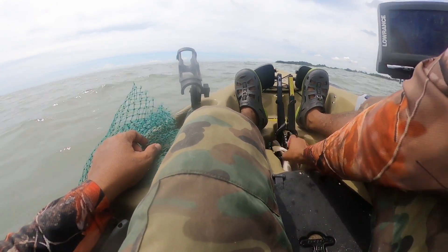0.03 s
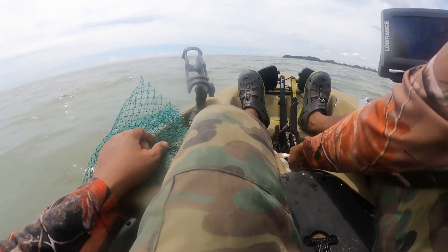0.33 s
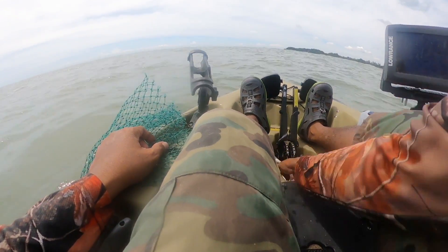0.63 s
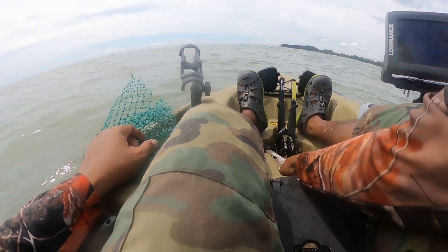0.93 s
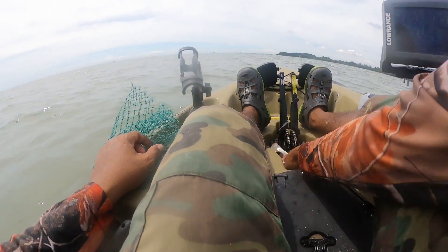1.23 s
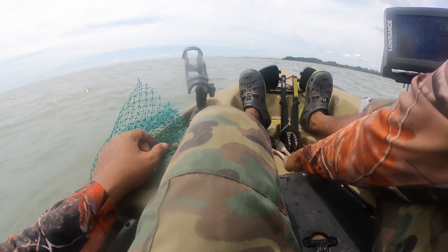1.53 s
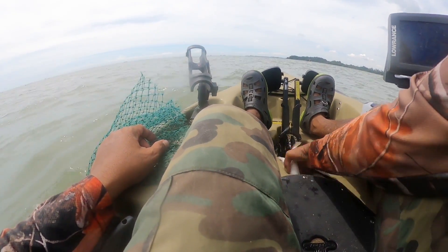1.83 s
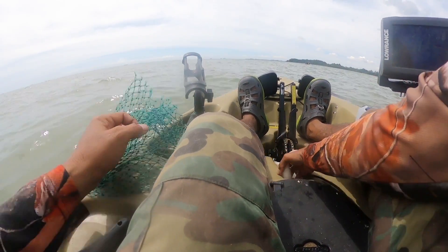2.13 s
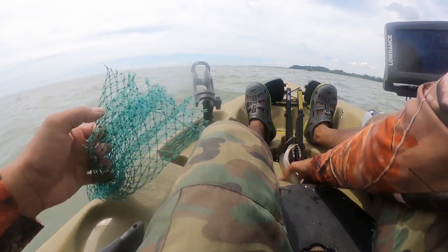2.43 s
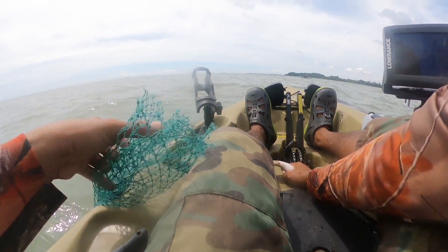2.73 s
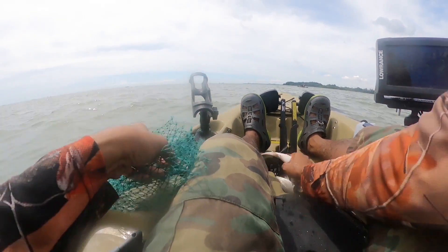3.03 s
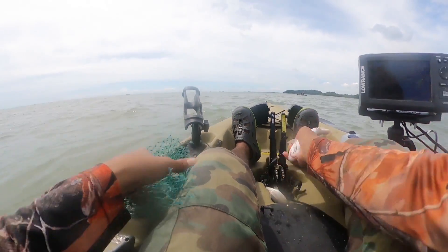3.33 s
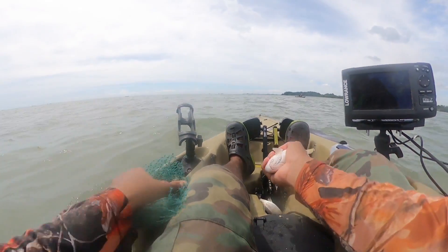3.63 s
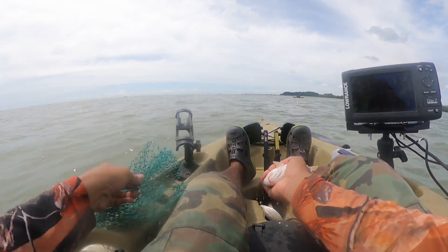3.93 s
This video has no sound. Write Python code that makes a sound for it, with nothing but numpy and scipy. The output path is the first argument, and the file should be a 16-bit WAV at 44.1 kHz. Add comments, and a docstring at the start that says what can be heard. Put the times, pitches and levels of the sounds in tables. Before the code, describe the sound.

Water laps against a plastic kayak with irregular hollow knocks, plops and small splashes, close by. Halfway through, a lifted wet net crackles, followed by rustling cloth, while gusts buffet the microphone over a low wash of open water.

```python
"""Waves against a kayak

Small waves slap, plop and gurgle against a hollow plastic hull, ringing its modes; heard from the seat.
A wet net is lifted, crackles and drips; sleeves rustle. Drips and plops ring as bubbles, spray is
grainy noise. Wind rumbles and thumps on the microphone over a low wash of open water."""
import sys
import numpy as np
from scipy import signal
from scipy.fft import rfft, irfft
from scipy.io import wavfile
from scipy.ndimage import uniform_filter1d

SR = 44100
rng = np.random.default_rng(int(sys.argv[2]) if len(sys.argv) > 2 else 0)


def int16_out(signal):
    """Quantize to a 16-bit WAV file."""
    q = np.round(np.clip(np.atleast_2d(signal).T, -1, 1) * 32767)
    wavfile.write(sys.argv[1], SR, q.astype(np.int16))


N = 176400
TIME_S = np.arange(N) / SR
LEAD_S, TAIL_S = 0.08, 0.2
EVENT_TIME_S = np.arange(-LEAD_S, TAIL_S, 1 / SR)


def amp(db):
    return 10 ** (np.asarray(db) / 20)


def unit_rms(x):
    return x / np.sqrt(np.mean(x ** 2) + 1e-20)


def unit_crest(x):
    """Scales the loudest 4 ms to rms 1."""
    return x / np.sqrt(uniform_filter1d(x ** 2, 180).max() + 1e-20)


def add(mix, start_s, sound):
    at = round(start_s * SR)
    part = mix[max(at, 0):max(at + len(sound), 0)]
    part += sound[max(-at, 0):][:len(part)]


def colour(x, spectrum):
    """Filters by (f/Hz, gain/dB) points on a log-frequency axis."""
    hz, db = np.transpose(spectrum)
    bins_hz = np.fft.rfftfreq(len(x), 1 / SR)
    gain = amp(np.interp(np.log(bins_hz + 1), np.log(hz), db))
    return irfft(rfft(x) * gain, len(x))


def wander(axis, step, count=2048):
    """Random curve with a new value at each step."""
    return np.interp((axis - axis[0]) / step, np.arange(count), rng.standard_normal(count), period=count)


def envelope(points):
    """Gain from (t/s, level/dB) points."""
    return amp(np.interp(TIME_S, *np.transpose(points)))


def burst(rise_s, decay_s):
    """Exponential swell to event time 0, then decay."""
    return np.exp(np.minimum(EVENT_TIME_S, 0) / rise_s - np.maximum(EVENT_TIME_S, 0) / decay_s)


def impulses(per_s):
    return rng.random(N) < per_s / SR


def turbulence(spectrum, flutter_db, step_s=0.028):
    """Coloured noise with a fluttering level."""
    flutter = amp(flutter_db * wander(TIME_S, step_s))
    return unit_rms(colour(rng.standard_normal(N) * flutter, spectrum))


# Wind spectrum: f/Hz, gain/dB
WIND_SPECTRUM = [(10, 2.5), (30, -1.5), (60, -2.5), (115, -8.5), (160, -12), (225, -19), (400, -28.5),
                 (800, -44), (2500, -92.5)]
# Gusts: t/s, level/dB
WIND_LEVEL = [(0, -44.5), (.43, -42.5), (.5, -29.5), (.6, -35), (.76, -43.5), (.83, -34), (1.3, -33.5),
              (1.52, -36.5), (1.70, -24.5), (1.8, -32.5), (1.98, -22.5), (2.15, -29.5), (2.32, -27.5),
              (2.6, -37.5), (2.84, -20.5), (3.06, -38), (3.16, -35.5), (3.43, -29.5), (3.55, -44),
              (3.71, -32), (3.88, -43), (4, -33.5)]
def wind():
    """Gusts buffet the microphone."""
    return envelope(WIND_LEVEL) * turbulence(WIND_SPECTRUM, flutter_db=2)


# Wash spectrum: f/Hz, gain/dB
WASH_SPECTRUM = [(30, 1), (120, 7), (210, 6), (400, -2.5), (600, -16.5), (1000, -26), (2000, -34),
                 (5500, -41), (8000, -48), (15000, -69.5)]
# Wash envelope: t/s, level/dB
WASH_LEVEL = [(0, -43), (1.3, -41), (2.4, -48), (3.1, -54), (4, -55)]
def wash():
    """Water churns low under the hull."""
    return envelope(WASH_LEVEL) * turbulence(WASH_SPECTRUM, flutter_db=3.2)


# Slosh spectrum: f/Hz, gain/dB
SLOSH_SPECTRUM = [(150, -51), (350, 13.5), (520, 9.5), (750, -0.5), (1080, 6), (1500, -9), (3000, -20.5),
                  (7000, -72)]
# Slosh envelope: t/s, level/dB
SLOSH_LEVEL = [(0, -75.5), (.75, -57), (.83, -51), (1.3, -67.5), (2.1, -54), (2.6, -58.5), (3.0, -55.5),
               (3.12, -47), (3.2, -57.5), (3.4, -59.5), (3.58, -48.5), (3.9, -57), (4, -53.5)]
def slosh():
    """Water sloshes alongside with a fast flutter."""
    return envelope(SLOSH_LEVEL) * turbulence(SLOSH_SPECTRUM, flutter_db=4.5, step_s=0.009)


# Rustle spectrum: f/Hz, gain/dB
RUSTLE_SPECTRUM = [(200, -9), (600, 12), (1100, 5), (1800, 3), (3000, -1), (4500, -3), (6200, -8.5),
                   (8000, -20.5), (11000, -31), (15000, -57)]
# Net and sleeve movement: t/s, level/dB
RUSTLE_LEVEL = [(0, -89), (.16, -58), (.43, -65), (.54, -56.5), (.68, -65), (1.08, -72), (1.18, -61.5),
                (1.37, -62), (1.43, -87), (1.55, -79), (1.83, -74), (2.03, -64), (2.13, -57), (2.47, -59.5),
                (2.52, -53), (2.62, -63), (2.97, -65.5), (3.36, -56.5), (3.44, -49), (3.53, -55),
                (3.67, -58.5), (3.73, -48.5), (3.8, -56), (3.84, -50), (3.92, -63.5), (4, -62.5)]
def rustle(snap_share=0.45):
    """Wet mesh and cloth rub: a hiss full of tiny snaps."""
    snap_db = 2.5 * np.minimum(rng.exponential(1, N), 5)
    snaps = impulses(per_s=900) * rng.choice([-1, 1], N) * amp(snap_db)
    crackle = unit_rms(colour(snaps, RUSTLE_SPECTRUM))
    hiss = turbulence(RUSTLE_SPECTRUM, flutter_db=2.5)
    return envelope(RUSTLE_LEVEL) * (np.sqrt(snap_share) * crackle + np.sqrt(1 - snap_share) * hiss)


# Modes of the hull and its air pocket: f/Hz, gain/dB, t60/s
HULL_MODES = [(234, 0.5, 0.033), (324, 1, 0.046), (406.6, 14, 0.055), (452, -4, 0.028), (541, -7, 0.074),
              (863, -2.5, 0.051), (1076, -28.5, 0.01), (1305, -18.5, 0.056), (1610, -16.5, 0.021)]
def hull(push, detune=0.02, uneven_db=1.0, cutoff_hz=1750):
    """Hull modes ring, shifting with waterline and spot hit; water softens each push."""
    t = np.arange(0, TAIL_S, 1 / SR)
    shifts, spots = rng.uniform(-1, 1, (2, len(HULL_MODES)))
    ring = np.zeros(len(t))
    for (hz, db, t60_s), shift, spot in zip(HULL_MODES, shifts, spots):
        fade = amp(db + uneven_db * spot - 60 * t / t60_s)
        ring += fade * np.sin(2 * np.pi * hz * (1 + detune * shift) * t)
    lowpass = signal.butter(2, cutoff_hz, fs=SR, output="sos")
    return signal.sosfilt(lowpass, signal.fftconvolve(push, ring))


def splash(spectrum, rise_s, decay_s, grain_db=2, grain_s=0.0019, ripple_db=3.5, ripple_hz=260):
    """Breaking water: a grainy burst with its own resonances, amid softer splashing."""
    n = len(EVENT_TIME_S)
    grains = rng.standard_normal(n) * amp(grain_db * wander(EVENT_TIME_S, grain_s))
    resonances = amp(ripple_db * wander(np.fft.rfftfreq(n, 1 / SR), ripple_hz))
    noise = irfft(rfft(grains) * resonances, n)
    skirt = amp(-14.5) * burst(rise_s=0.012, decay_s=0.016)
    shape = burst(rise_s, decay_s) + skirt
    return unit_crest(colour(noise * shape, spectrum))


SPRAY_RISE_PER_DECAY = 0.41
# Smack spectrum: f/Hz, gain/dB
SMACK_SPECTRUM = [(200, -27.5), (500, 1), (900, 3), (1400, 3.5), (1700, -1), (2200, -8.5), (3200, -39),
                  (7000, -57)]
# Spray spectrum: f/Hz, gain/dB
SPRAY_SPECTRUM = [(500, -45), (1500, 1), (2300, 1.5), (3100, 3), (4000, -2.5), (5600, -6), (6700, -14),
                  (8000, -25.5), (11500, -40), (15000, -68.5)]
# Water and wet gear hitting the hull: t/s, knock/dB, smack/dB, spray/dB, spray decay/s
SLAPS = [(0.141, -29.5, -39, -47.5, 0.0045), (0.215, -29.5, -58, -75, .005), (0.400, -31, -62, -63, .006),
         (.470, -21.5, -31.5, -35.5, 0.0051), (0.621, -38, -44.5, -44.5, 0.0028),
         (0.756, -31, -65, -79, .006), (.797, -31, -59, -80, .005), (0.829, -34, -52, -57, 0.008),
         (.866, -37, -47, -51, 0.018), (0.922, -31.5, -59, -58.5, 0.017),
         (0.979, -43, -47.5, -53.5, 0.0032), (1.166, -39, -74, -60, 0.014), (1.672, -42.5, -69, -49, 0.018),
         (1.73, -24.5, -40.5, -50, 0.025), (1.895, -37, -43.5, -50, 0.022), (1.981, -29, -45, -35.5, 0.016),
         (1.996, -24.5, -26.5, -28.5, 0.0064), (2.017, -29, -51, -48, 0.017),
         (2.058, -27, -34.5, -43, 0.0044), (2.076, -38, -67, -49, 0.018),
         (2.277, -25.5, -34.5, -42, 0.0052), (2.33, -39, -81, -49, 0.0077),
         (2.362, -36.5, -37.5, -39, 0.0041), (2.407, -59, -42.5, -52.5, 0.012),
         (2.531, -28, -28.5, -32, 0.0051), (2.552, -26, -34.5, -40.5, 0.0077), (2.655, -24, -65, -46, 0.01),
         (2.721, -28.5, -38.5, -40.5, 0.0078), (2.775, -30.5, -48.5, -58.5, .006),
         (3.253, -29.5, -40, -55, 0.018), (3.306, -30.5, -49, -55, .006)]
def slaps(knock_lag_s=0.001846, knock_spread_s=0.0074, pivot_hz=3500):
    """Water smacks shut on the side, knocks the hull and throws spray; glancing slaps spray brighter."""
    out = np.zeros(N)
    t = np.arange(0, LEAD_S, 1 / SR)
    for at_s, knock_db, smack_db, spray_db, decay_s in SLAPS:
        push = 0.082 * rng.standard_normal(len(t)) * np.exp(-t / knock_spread_s)
        push[0] += 1  # main impact, ahead of the scatter
        add(out, at_s + knock_lag_s, amp(knock_db) * unit_crest(hull(push)))
        smack = splash(SMACK_SPECTRUM, rise_s=0.0015, decay_s=0.0057)
        add(out, at_s - LEAD_S, amp(smack_db) * smack)
        tilt_db_per_octave = 0.3 * max(spray_db - smack_db, -10)
        tilted = [(hz, db + tilt_db_per_octave * np.log2(hz / pivot_hz)) for hz, db in SPRAY_SPECTRUM]
        spray = splash(tilted, SPRAY_RISE_PER_DECAY * decay_s, decay_s)
        add(out, at_s - LEAD_S, amp(spray_db) * spray)
    return out


def bubbles(table, rise_s, wobble, wobble_step_s):
    """One bubble per row rings at an unsteady pitch."""
    out = np.zeros(N)
    for at_s, hz, db, decay_s in table:
        pitch_hz = hz * (1 + wobble * wander(EVENT_TIME_S, wobble_step_s))
        ring = burst(rise_s, decay_s) * np.sin(2 * np.pi * np.cumsum(pitch_hz) / SR)
        add(out, at_s - LEAD_S, amp(db) * unit_crest(ring))
    return out


# Air pockets: t/s, f/Hz, level/dB, decay/s
PLOPS = [(.218, 423, -33, 0.0051), (.474, 1647, -34, 0.0041), (.666, 313, -30.5, 0.0028),
         (.759, 950, -43, 0.0049), (.773, 426, -29.5, 0.006), (.817, 398.4, -31, 0.027),
         (.868, 396.2, -34, 0.0079), (1.535, 560, -41.5, 0.013), (2.002, 517.8, -22, 0.0061),
         (2.283, 437.9, -25.5, 0.0057), (2.537, 503.7, -24, 0.0054), (2.779, 1074, -41, 0.0079),
         (2.796, 417.4, -27, 0.0016), (2.814, 400.4, -35.5, .004), (2.845, 288.3, -26, 0.0016),
         (3.248, 446, -30, 0.0026), (3.256, 1070, -33.5, 0.0099), (3.259, 457, -29.5, 0.0099),
         (3.353, 874, -39, 0.0065), (3.361, 688, -42, .007)]
def plops():
    """Larger air pockets plop against the side."""
    return bubbles(PLOPS, rise_s=0.0028, wobble=0.131, wobble_step_s=0.0018)


# Wind buffets: t/s, f/Hz, level/dB
WIND_THUMPS = [(0.508, 45, -25.5), (1.728, 39.7, -23), (2.022, 55.5, -23), (2.201, 60.3, -19.5),
               (2.742, 69, -22), (2.758, 118, -21), (2.792, 110, -18), (2.808, 60, -13), (2.838, 71, -20),
               (2.863, 84.6, -20), (2.975, 68.4, -20), (3.066, 36.6, -18.5), (3.17, 67.6, -21.5),
               (3.424, 59, -28)]
def wind_thumps():
    """Low, soft thumps of wind buffeting the microphone."""
    out = np.zeros(N)
    for at_s, hz, db in WIND_THUMPS:
        phase_squared = (np.pi * hz * EVENT_TIME_S) ** 2
        pulse = (1 - 2 * phase_squared) * np.exp(-phase_squared)
        add(out, at_s - LEAD_S, amp(db) * pulse)
    return out


# Drips: t/s, f/Hz, level/dB, decay/s
DRIPS = [(.552, 3890, -48, 0.0068), (1.644, 6060, -57.5, 0.014), (1.796, 2900, -53, 0.005),
         (1.98, 5630, -32.5, 0.0035), (1.994, 1763, -23, 0.0037), (2.000, 2880, -34.5, 0.0085),
         (2.201, 3130, -44.5, 0.011), (2.364, 3010, -36, 0.0056), (1.218, 4540, -54.5, 0.0034),
         (3.443, 3460, -38.5, 0.0044)]
def drips():
    """Drips ring as small, high bubbles."""
    return bubbles(DRIPS, rise_s=0.0012, wobble=0.085, wobble_step_s=0.0005)


# Fine spray spectrum: f/Hz, gain/dB
SIZZLE_SPECTRUM = [(2500, -21), (6300, 4.5), (8300, -9), (12500, -18), (16000, -21)]
# Fine spray landings: t/s, level/dB, decay/s
SIZZLES = [(.642, -62, 0.0075), (.862, -66, 0.043), (1.217, -64, .003), (1.681, -58.5, 0.011),
           (1.754, -60, 0.0022), (3.429, -68, .04)]
def fine_spray():
    """The finest droplets land in short, bright sizzles."""
    out = np.zeros(N)
    for at_s, db, decay_s in SIZZLES:
        sizzle = splash(SIZZLE_SPECTRUM, SPRAY_RISE_PER_DECAY * decay_s, decay_s)
        add(out, at_s - LEAD_S, amp(db) * sizzle)
    return out


# Gurgles under the hull: t/s, length/s, level/dB
GURGLES = [(0.797, 0.084, -34.5), (1.019, 0.12, -40), (1.532, 0.054, -48.5), (2.789, 0.097, -46.5),
           (3.31, 0.073, -39.5), (3.783, 0.018, -42.5), (3.859, 0.045, -44.5)]
def gurgles(fade_s=0.0069):
    """Trapped air escapes in a quick run of small pushes on the hull."""
    out = np.zeros(N)
    for at_s, length_s, db in GURGLES:
        pushes = impulses(per_s=1100) * rng.standard_normal(N)
        t = TIME_S[TIME_S < length_s]
        shape = np.clip(np.minimum(t, length_s - t) / fade_s, 0, 1)
        ring = hull(pushes[:len(t)] * shape, detune=0.011, uneven_db=12.5)
        power = np.sum(ring ** 2) / len(t)
        add(out, at_s, amp(db) * ring / np.sqrt(power + 1e-20))
    return out


# Crackle of the lifted net: t/s, level/dB
NET_LEVEL = [(1.8, -84), (1.88, -61.5), (1.96, -59), (2.09, -54.5), (2.13, -66), (2.2, -58.5),
             (2.38, -56.5), (2.46, -80), (2.52, -63), (2.65, -75)]
def net(clump_db=4.5, clump_s=0.005):
    """Wet mesh peels apart and sheds water: clumps of tiny unpitched snaps."""
    snaps = impulses(per_s=900) * rng.standard_normal(N)
    clumps = amp(clump_db * wander(TIME_S, clump_s))
    return envelope(NET_LEVEL) * unit_rms(colour(snaps * clumps, SPRAY_SPECTRUM))


def scene():
    """Mono mix."""
    bed = wind() + wash() + slosh() + rustle()
    events = slaps() + plops() + wind_thumps() + drips() + fine_spray() + gurgles() + net()
    return (bed + events)[None]


def record(dry):
    """Band limit."""
    cutoff_hz = 15600
    lowpass = signal.firwin(511, cutoff_hz, window=("kaiser", 9), fs=SR)
    return signal.oaconvolve(dry, lowpass[None], "same")


dry = scene()
out = record(dry)
int16_out(out)
```